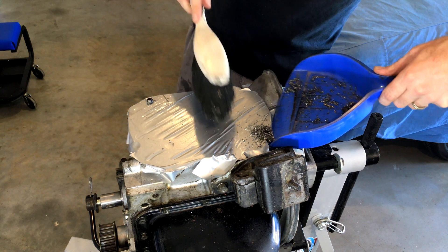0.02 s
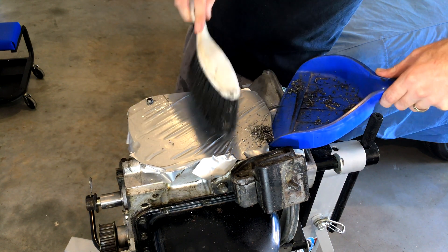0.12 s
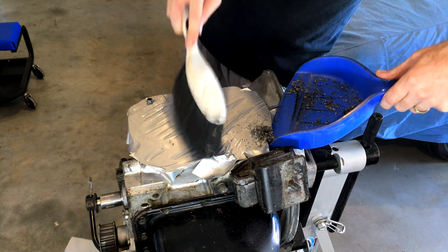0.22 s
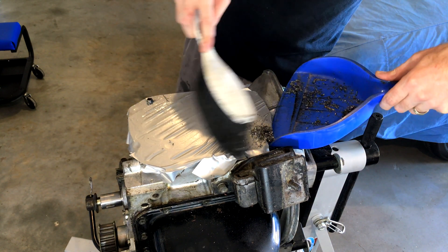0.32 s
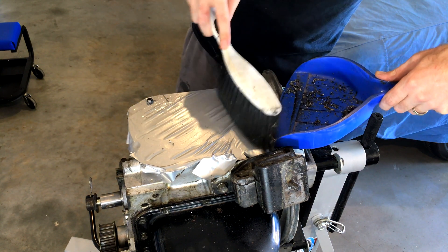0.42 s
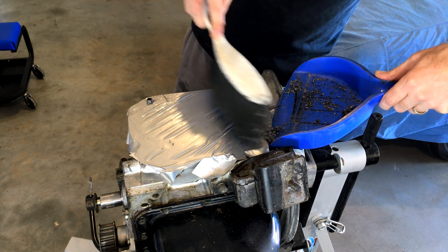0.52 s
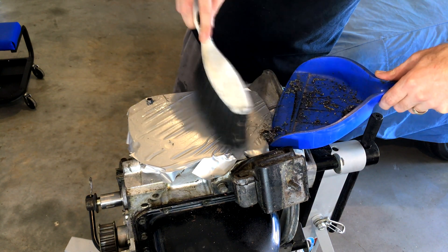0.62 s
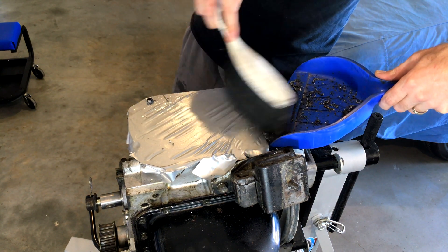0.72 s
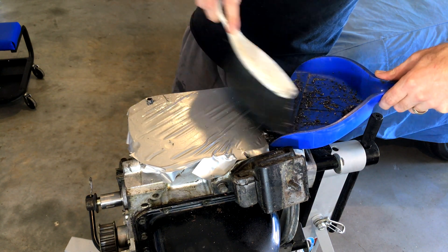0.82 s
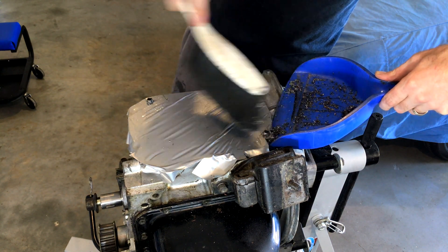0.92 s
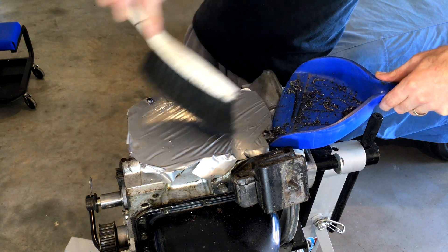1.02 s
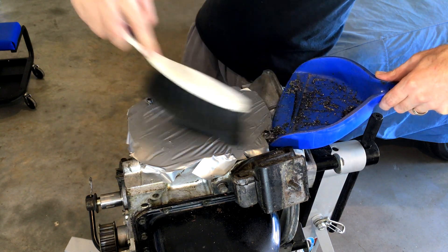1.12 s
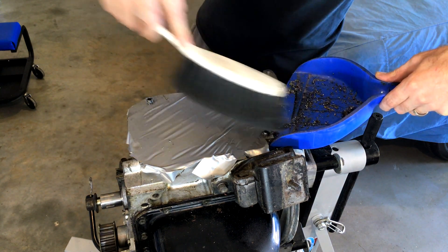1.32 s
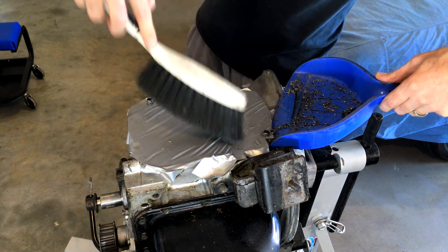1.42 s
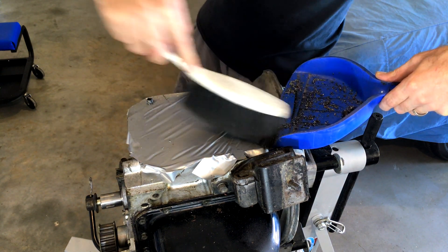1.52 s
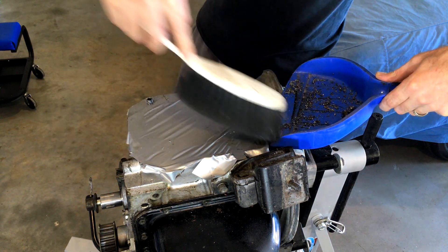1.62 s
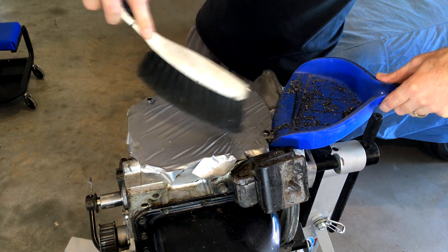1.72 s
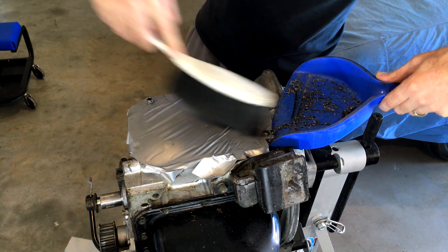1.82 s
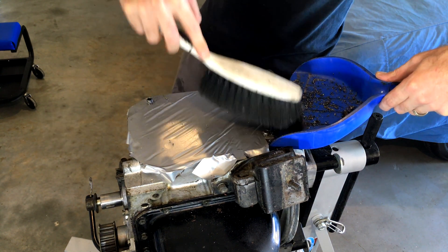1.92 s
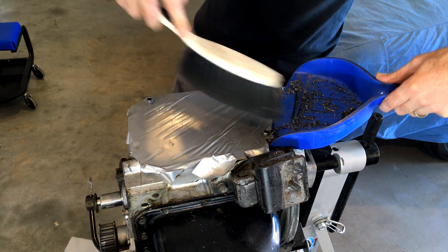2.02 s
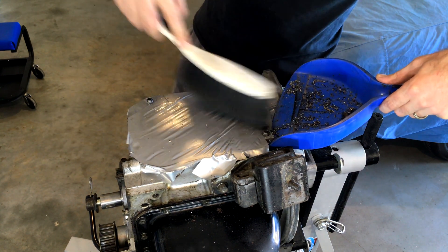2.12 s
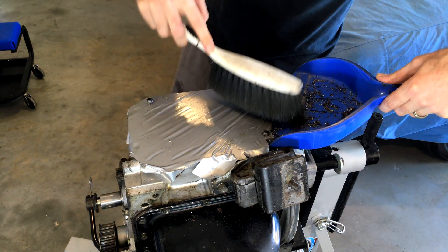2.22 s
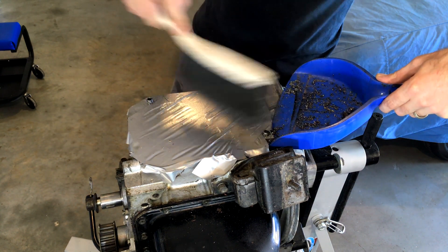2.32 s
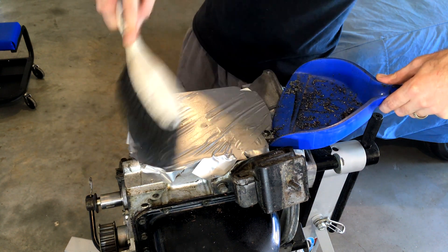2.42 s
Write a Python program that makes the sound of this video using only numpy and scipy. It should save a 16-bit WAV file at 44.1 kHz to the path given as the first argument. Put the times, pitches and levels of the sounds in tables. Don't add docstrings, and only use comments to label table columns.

```python
import sys
import numpy as np
from scipy import signal
from scipy.fft import rfft, irfft
from scipy.io import wavfile
from scipy.ndimage import uniform_filter1d

SR = 44100
rng = np.random.default_rng(int(sys.argv[2]) if len(sys.argv) > 2 else 0)


def invert_db(x):
    u = np.asarray(x, float) / 20
    return 10 ** u


def pcm_store(signal):
    levels = np.round(np.clip(np.atleast_2d(signal), -1, 1) * 32767)
    wavfile.write(sys.argv[1], SR, levels.astype(np.int16).T)


N = 108045
SLIPS_PER_S, SLIP_SPREAD_DB = 8500, 2.5
BUMPS_PER_S, BUMP_SPREAD_DB = 3000, 0.5


def level(x, db=0):
    return x * invert_db(db) / np.sqrt(np.mean(x ** 2))


def band(x, lo_hz, hi_hz):
    sos = signal.butter(2, [lo_hz, min(hi_hz, .45 * SR)], "band", fs=SR, output="sos")
    return signal.sosfilt(sos, x)


def colour(x, points):
    hz, db = np.array(points).T
    bins_hz = np.arange(1, 2050) * SR / 4096
    log_gain = np.interp(np.log(bins_hz), np.log(hz), db) * np.log(10) / 20
    cepstrum = irfft(log_gain)
    cepstrum[1:2048] *= 2
    cepstrum[2049:] = 0
    response = irfft(np.exp(rfft(cepstrum)))[:2048]
    return signal.fftconvolve(x, response)[:N]


def walk(rate):
    hold = int(SR / rate)
    steps = np.repeat(rng.standard_normal(N // hold + 1), hold)
    return 1.2 * uniform_filter1d(steps, hold)[:N]


def ring(x, modes, scatter_db=0.):
    out = 0
    for hz, db, t60 in modes:
        pole = np.exp(2j * np.pi * hz / SR - np.log(1000) / (t60 * SR))
        drive = x * invert_db(scatter_db * walk(60))
        out = out + invert_db(db) * signal.lfilter([1], [1, -pole], drive).imag
    return out


def peak(modes):
    return np.abs(ring(np.arange(N) == 0, modes)).max()


def clicks(rate, spread_db):
    hit = rng.random(N) < rate / SR
    strength = invert_db(spread_db * np.minimum(rng.exponential(size=N), 3))
    return hit * rng.standard_normal(N) * strength


def strikes(times, db, decay_s):
    at = np.zeros(N)
    np.add.at(at, (np.asarray(times) * SR).astype(int), invert_db(np.asarray(db)))
    return signal.lfilter([1], [1, -np.exp(-1 / (decay_s * SR))], at)


def place(times, rows):
    out = np.zeros(N + rows.shape[1])
    for s, row in zip(times, rows):
        out[int(s * SR):][:len(row)] += row
    return out[:N]


def swell(start_s, length_s):
    return np.sin(np.pi * np.clip((np.arange(N) / SR - start_s) / length_s, 0, 1))


# f/Hz, level/dB
HUM_SPECTRUM = [(18, -3.5), (57, 6), (307, -8), (373, -11), (479, -8), (688, -19), (4330, -25),
                (5720, -24.5), (15600, -25)]


def garage():
    return level(colour(rng.standard_normal(N), HUM_SPECTRUM), -63.5)


# t/s, length/s, graze level/dB, rub level/dB
BACK_SWINGS = [
    (-.05, 0.27, -68.5, -63.5),
    (0.783, 0.33, -82, -74),
    (0.967, 0.27, -68.5, -62),
    (1.458, .2, -60, -56.5),
    (1.882, 0.11, -64, -59.5),
]
# f/Hz, level/dB, t60/s
GRAZE_MODES = [(5840, 2, 0.0038), (5200, -22, 0.0079)]
RUB_MODES = [(335, 4.7, 0.068), (410, 8.8, 0.022)]


def swings():
    graze = level(ring(clicks(6000, 2.5), GRAZE_MODES))
    rub = level(ring(clicks(1500, 2.5), RUB_MODES))
    out = 0
    for start, length, graze_db, rub_db in BACK_SWINGS:
        out = out + (invert_db(graze_db) * graze + invert_db(rub_db) * rub) * swell(start, length)
    return out


# t/s, bristle drag level/dB, pan level/dB re drag, tape level/dB re drag
LONG_STROKE = [(.238, -70, 2, -4), (.241, -44.5, 15, 2.5), (.262, -51.5, -6, 6.5), (.29, -49.5, 0, 6),
               (.33, -47.5, -3, -1.5), (.395, -48.5, 6, 3), (.435, -52, 8, 1.5), (.485, -60.5, -9, 0.5),
               (.497, -55.5, -28, 1), (.515, -57, -24, 2.5), (.59, -61.5, -4, 4), (.627, -65.5, -6, -10),
               (.631, -53, 22, 16), (.655, -53, 5.5, -2), (.69, -49.5, 8.5, 4.5), (.722, -52, 7.5, 0),
               (.735, -49, -20, -2), (.755, -53, -28, 2.5), (.766, -59.5, 0, 3.5)]
STROKES_ON_LIP = [(1.073, -64, 9, -1), (1.083, -43, 0, -6), (1.1, -50, 2, -1), (1.15, -49, 2.5, -4.5),
                  (1.2, -46, 1, -1.5), (1.238, -52, 6, -8), (1.25, -54.5, -16, -4.5), (1.3, -66, 3, 1),
                  (1.454, -70, -17, 4), (1.459, -48, -10, -2), (1.485, -51.5, -1.5, 0),
                  (1.52, -49, -14, -6.5), (1.55, -51.5, -14, 0), (1.565, -63, -1, 0), (1.625, -63, -3, 2),
                  (1.65, -72.5, -4, 1.5)]
LAST_STROKES = [(1.794, -83, -2, 15.5), (1.799, -44.5, 4, 2), (1.811, -54, 10.5, -2.5), (1.83, -48, 9, -3),
                (1.854, -48, 4, 0.5), (1.875, -43.5, -8, -17), (1.899, -48, -6.5, -1.5),
                (1.93, -57, -11, -4), (2.114, -76, -8, 2), (2.118, -43, -1, -8), (2.135, -54, 7, 1),
                (2.151, -44, 4, -7), (2.166, -51, -13, -1.5), (2.193, -50.5, -2.5, -2.5),
                (2.27, -69.5, 0.5, -2)]
LIFTED = [(0, -69, 6.5, 3.5), (.12, -77, 12.5, 2), (.22, -75, 0, -1), (.83, -63.5, -4.5, 0),
          (.97, -79.5, 3, 7.5), (1.43, -74.5, -1.5, 1.5), (1.76, -76.5, -4, 1.5), (2.02, -70, -2, 2.5),
          (2.09, -74.5, -6.5, 1.5), (2.45, -72, 4, 1.5)]
# f/Hz, level/dB
HISS_COLOUR = [(1500, -15), (2600, -10.5), (3300, -2.5), (5500, -6.5), (6900, -18.5), (8200, -12.5),
               (10500, -16.5), (14000, -17)]
# f/Hz, level/dB, t60/s
PAN_MODES = [(314, -14.5, 0.018), (450, -41, 0.011), (528.5, -4, 0.033), (630, 0.5, 0.048),
             (700, 2.5, 0.021), (814, 6.5, 0.022), (968, -2.5, 0.028)]
TAPE_MODES = [(1160, 7.5, 0.012), (1342, -0.5, 0.038), (1480, 3, 0.02), (1587, 10, 0.012), (1825, 1, 0.01),
              (2086, -1, 0.019)]


def brush():
    rows = np.vstack([LONG_STROKE, STROKES_ON_LIP, LAST_STROKES, LIFTED])
    s, drag, pan, tape = rows[np.argsort(rows[:, 0])].T

    def curve(db):
        return invert_db(np.interp(np.arange(N) / SR, s, db))

    def drummed(hits, modes, weight):
        drive = hits / np.sqrt(np.mean(ring(hits, modes) ** 2))
        return ring(drive * curve(drag + weight), modes, 1.5)

    flicker = invert_db(2.2 * walk(90))
    slips = 0
    for lo_hz in 1200 * 1.3 ** np.arange(11):
        patch = band(clicks(SLIPS_PER_S, SLIP_SPREAD_DB), lo_hz, 1.3 * lo_hz)
        slips = slips + patch * invert_db(2.0 * walk(12))
    hiss = level(colour(slips * flicker, HISS_COLOUR)) * curve(drag)
    top_gain = curve(-0.21 * np.clip(drag + 52, -8, 8))
    hiss = hiss + band(hiss, 4100, 24000) * (top_gain - 1)
    drum = drummed(clicks(BUMPS_PER_S, BUMP_SPREAD_DB), PAN_MODES, pan)
    skin = drummed(clicks(3500, 2.76), TAPE_MODES, tape)
    return invert_db(-0.5) * hiss + drum + invert_db(1.0) * skin


# t/s, peak level/dB, struck spot f/Hz
PAN_KNOCKS = [(0.245, -12, 634), (0.251, -42, 700), (0.254, -18.5, 610), (.416, -25, 640),
              (0.568, -33.5, 540), (0.631, -15.5, 600), (0.638, -21, 745), (.685, -19, 606),
              (0.713, -23.5, 604), (1.084, -26.5, 700), (1.139, -19.5, 685), (1.156, -25, 620),
              (1.183, -20, 790), (1.198, -20, 760), (1.211, -23, 630), (1.221, -23, 646),
              (1.2265, -23.5, 650), (1.2355, -19, 630), (1.492, -23.5, 635), (1.798, -19, 900),
              (1.802, -23, 820), (1.826, -18, 795), (1.829, -26, 720), (1.838, -28, 656), (1.845, -15, 720),
              (2.12, -16.5, 785), (2.128, -19, 735), (2.146, -19.5, 730)]


def knocks():
    push_s = 0.00043
    s, db, hz = np.array(PAN_KNOCKS).T
    blow = np.exp(-np.arange(SR // 50) / (push_s * SR)) / (push_s * SR)
    blows = [invert_db(d - 5.5) * band(blow, f / 1.34, f * 1.36) for d, f in zip(db, hz)]
    push = place(s, np.array(blows))
    hollow = 1.76 * ring(push, PAN_MODES) / peak(PAN_MODES)
    skin = invert_db(-1) * ring(push, TAPE_MODES) / peak(TAPE_MODES)
    return hollow + skin


def stand():
    shake = strikes([.245, .33], [-54, -55], 0.0097) / 170
    return ring(shake, [(70, 11.0, 0.054), (132, 13, 0.145)])


# t/s, length/s, level/dB, lowest f/Hz
TIP_WHISPERS = [
    (1.11, .14, -62.5, 13200),
    (1.51, .13, -63, 10800),
    (1.82, .14, -65, 11500),
    (.27, .2, -64, 8000),
]


def whispers():
    slips = clicks(SLIPS_PER_S, SLIP_SPREAD_DB)
    out = 0
    for start, length, db, lo_hz in TIP_WHISPERS:
        hiss = band(band(slips, lo_hz, 15000), lo_hz, 15000)
        out = out + level(hiss, db) * swell(start, length)
    return out


# t/s, peak level/dB, f/Hz, glint level/dB re peak, thud level/dB
FALLING_CHIPS = [(0.4909, -47, 3850, -8, -2), (0.4971, -39, 4500, -11, -10), (0.5005, -36, 4630, -11, -6),
                 (0.5037, -34.5, 4730, -9, -8), (0.5094, -39, 3440, -10, -7),
                 (0.5206, -37.5, 3650, -16, -11), (0.5362, -39.5, 4220, -12, -7),
                 (0.5449, -37.5, 4100, -12, -7), (0.5548, -48, 4080, -12, 3.5),
                 (0.5677, -40.5, 4040, -11, -12), (0.5766, -44.5, 4240, -7, -7),
                 (0.5932, -49, 3800, -17, -8), (0.6015, -39, 5210, -12, -2), (0.7458, -34, 3800, -10, -11),
                 (0.7833, -50, 4900, -16, 0), (0.7874, -47, 4050, -12, -10), (0.8005, -51, 4700, -14, -7),
                 (0.8046, -45, 4540, -13, -1), (0.83, -47, 3840, -13, -13), (0.8449, -47, 4000, -21, -5),
                 (0.8767, -51, 4150, -14, -5), (0.9084, -52.5, 6010, -19, -6),
                 (1.0071, -59.5, 5680, -10, 6), (1.267, -50, 3480, -4, 2.5), (1.326, -45.5, 4210, -6, -15),
                 (1.3638, -46.5, 3220, -20, -10), (1.4621, -35, 3770, -23, -21),
                 (1.5246, -40.5, 3370, -23, -13),
                 (1.9549, -40, 3640, -21, -12), (1.974, -46, 5400, -10, -4), (2.0091, -46, 3270, -10, -2),
              (2.0164, -51, 2820, -9, -9), (2.0477, -55, 3770, -17, -12), (2.066, -58, 3950, -13, -5),
              (2.1188, -34, 3120, -30, -4), (2.165, -33.5, 3400, -21, -19), (2.2102, -38, 3850, -22, -10),
              (2.247, -46, 3850, -23, -17), (2.2982, -52, 2560, -10, 2), (2.3048, -45.5, 3920, -16, -5),
              (2.3277, -51, 3860, -21, -13), (2.3383, -52, 3040, -15, -8), (2.363, -49.5, 3950, -14, -3.5),
              (2.4046, -42.5, 4240, -18, -5.5),
                 (.6112, -43, 3900, -9, -16), (.6152, -40, 4900, -11, -16), (1.0296, -57, 3900, 1, -2),
               (1.073, -58, 5400, 4, -4), (1.9815, -51, 4200, -9, -8), (2.0822, -57, 3900, -6, -6),
               (2.2865, -49, 4500, -13, 5), (2.3705, -57, 4000, -1, -6)]


def chips():
    s, db, hz, glint, thud = np.array(FALLING_CHIPS).T
    t = np.arange(SR // 50) / SR
    decay = np.exp(-t / 0.0014) * np.minimum(t / 0.00045, 1)
    rattle = rng.standard_normal((len(s), len(t))) * decay

    def to_peak(rows, peak_db):
        return rows / np.abs(rows).max(axis=1, keepdims=True) * invert_db(peak_db - 0.5)[:, None]

    ticks = [band(r, f / 1.11, f * 1.097) + 0.67 * band(r, 2430, 5840) for r, f in zip(rattle, hz)]
    landing = to_peak(np.array(ticks), db)
    landing = landing + to_peak(band(rattle, 6400, 15000), db + glint + 8.0)
    landing = landing + to_peak(band(rattle, 1107, 1580), db + thud + 0.5)
    return place(s, landing)


def rim():
    start_s, end_s, modes = 1.06, 1.242, [(630, 0, .13)]
    t, bumps = np.arange(N) / SR, clicks(BUMPS_PER_S, BUMP_SPREAD_DB)
    run = np.clip((t - start_s) / (end_s - start_s), 0, 1) * (t < end_s)
    return ring(bumps * run, modes) * invert_db(-43.5) / np.std(ring(bumps, modes))


def echo(near):
    t60_s, gap_s = 0.18, .004
    t = np.arange(SR // 2) / SR
    tail = rng.standard_normal(len(t)) * 1e-3 ** (t / t60_s) * (t > gap_s)
    return invert_db(-12) * signal.fftconvolve(near, tail / np.sqrt(np.sum(tail ** 2)))[:N]


def scene():
    near = brush() + knocks() + whispers() + chips() + rim()
    near = signal.sosfilt(signal.butter(4, 310, "high", fs=SR, output="sos"), near)
    near = near + swings() + stand()
    return (near + echo(near) + garage())[None]


def band_limit(x):
    return signal.sosfilt(signal.butter(12, 15750, fs=SR, output="sos"), x)


def record(dry):
    mix = signal.sosfilt(signal.ellip(10, .2, 70, 15750, fs=SR, output="sos"), dry)
    return band_limit(mix)


dry = scene()
out = record(dry)
pcm_store(out)
```